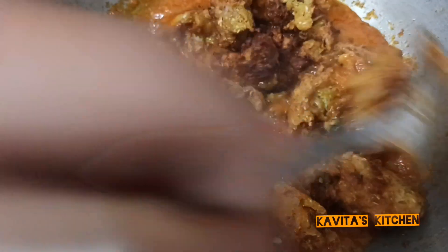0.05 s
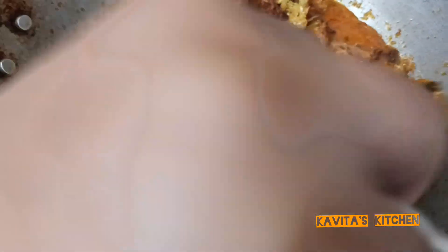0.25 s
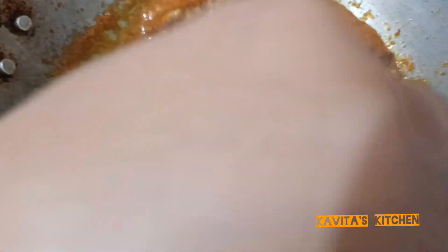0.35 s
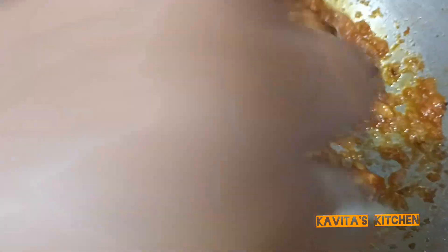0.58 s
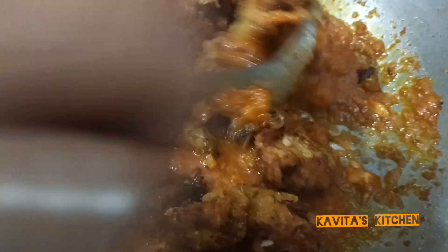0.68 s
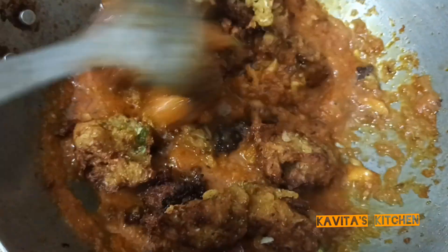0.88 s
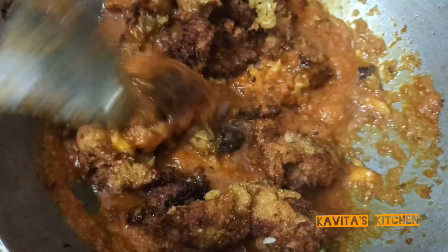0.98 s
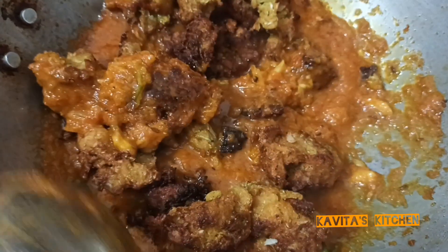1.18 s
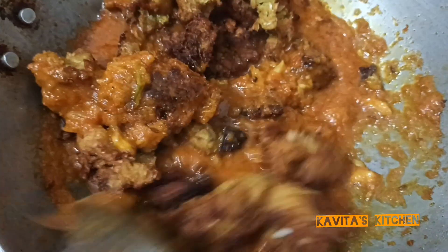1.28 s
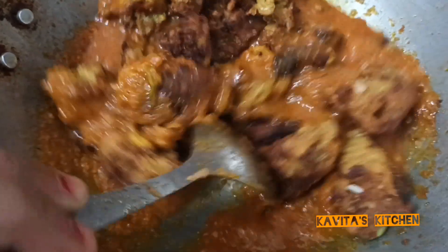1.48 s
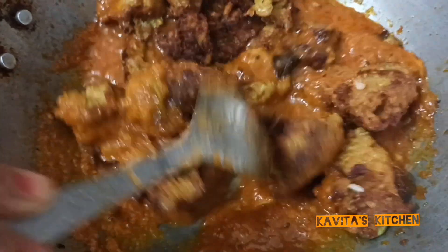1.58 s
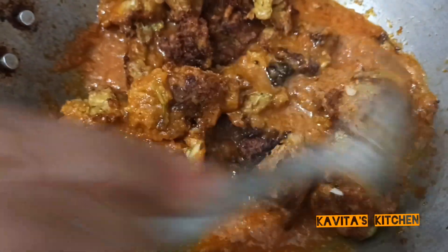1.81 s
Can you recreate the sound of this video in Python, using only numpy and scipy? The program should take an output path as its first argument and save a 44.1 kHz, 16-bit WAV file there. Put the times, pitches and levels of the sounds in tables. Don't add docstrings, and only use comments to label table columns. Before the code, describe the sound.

A metal spoon scrapes a metal pan: a faint stroke end, a loud bright scrape, then two softer strokes each opening with a sharp knock. Wet ticks and faint kitchen hum; close stereo microphones.

```python
import sys
import numpy as np
from scipy import signal
from scipy.io import wavfile
from scipy.ndimage import uniform_filter1d

SR = 44100
rng = np.random.default_rng(int(sys.argv[2]) if len(sys.argv) > 2 else 0)


def master(y):
    cut = np.clip(np.atleast_2d(y).T, -1, 1)
    pcm = np.round(cut * 32767)
    wavfile.write(sys.argv[1], SR, pcm.astype(np.int16))


def attenuation_scalar(level_db):
    decades = np.asarray(level_db, float) / 20
    return 10 ** decades


N = 81585

# t/s, pressure/dB, brightness/(dB/octave), bass weight/dB
TAIL_CONTACT = [
    (0, -39.5, -5.5, 2.5),
    (0.046, -54.5, -7, 10.5),
    (0.083, -56.5, -6.5, -14.5),
    (0.128, -73, 9, 28.5),
]
FIRST_CONTACT = [
    (0.143, -26.5, 4.5, -7.5),
    (0.199, -26, -3, 5),
    (0.258, -33, -8.5, -1.5),
    (0.329, -47, -15, -10),
    (0.379, -65.5, -1, -20),
    (.43, -83, -13, 0),
]
SECOND_CONTACT = [(0.795, -42, 6, -19), (0.857, -34, 0, -9), (.93, -44.5, -1, 9.5),
                  (0.978, -51.5, -2.5, 12.5), (1.007, -61, 0, -5), (1.053, -53, -7, -36),
                  (1.11, -64, -2, -36), (1.16, -73, 4.5, -28), (1.219, -100, -18, -10)]
THIRD_CONTACT = [(1.464, -39, 0, 10.5), (1.52, -33.5, 2.5, 4), (1.559, -35.5, -3.5, 4.5),
                 (1.6, -42, -3.5, 7), (1.649, -40.5, -7, 1), (1.689, -47, -9, -46), (1.73, -60.5, 1, -35),
                 (1.77, -80, -11, -7)]
# f/Hz, density level/dB
TAIL_BODY = [(70, -28), (340, -17.5), (1080, -22), (2430, -4), (7000, -23.5)]
FIRST_BODY = [(60, -32), (200, -5), (310, -2.5), (1060, -13), (1500, -10), (2200, -8.5), (4500, -6.5),
              (16000, -25.5)]
SECOND_BODY = [(100, -69), (250, -34), (340, -6), (1000, -9), (1700, -4.5), (2600, -10), (7000, -15),
               (16000, -24)]
THIRD_BODY = [(80, -51), (350, 2), (810, -16), (1200, -9.5), (2500, 4), (3500, -8.5), (6500, -1),
              (16000, -9)]
# f/Hz, width/Hz, level/dB
TAIL_MODES = [(1606, 65, -4), (2293, 35, 8), (2880, 69, -1.5), (3450, 55, 0.5), (4340, 83, -16)]
FIRST_MODES = [(868, 35, -10.5), (1017, 37, -9.5), (1227, 210, 0.5), (2122, 42, -1.5), (2204, 270, 2.5),
               (3080, 70, -21), (3825, 44, -14)]
SECOND_MODES = [(352.5, 16.4, 7), (505, 16, -9), (920, 6.2, -9), (1365, 9.1, 3), (1770, 16, -10),
                (2434, 310, 11), (3700, 110, -40.5), (5320, 150, -4)]
THIRD_MODES = [(356, 8.3, -6.5), (826, 107, 1.5), (1338, 28, -15), (2300, 260, -10), (3000, 94, -22),
               (4240, 660, 1), (6220, 43, -3)]
STROKE_MODES_DB = [-6, -4.5, -1, -2]
STROKE_PAN_DB = [1.5, -0.9, -1, 0.7]
# f/Hz, width/Hz, depth/0-1
STROKE_GAPS = [
    [(7500, 900, .6)],
    [(1550, 200, .4)],
    [(720, 200, .5), (8100, 500, .7)],
    [(1180, 350, .95), (3550, 900, 1), (5650, 1000, .85), (8300, 800, .7)],
]
# start t/s, length/s, level/dB, f/Hz
LINGERING_MODES = [(0.172, 0.2, -51.5, 85.7), (0.309, 0.079, -58, 3656), (0.332, 0.086, -60.5, 2226),
                   (1.031, 0.04, -58, 5010), (1.142, 0.056, -63.5, 3700), (1.496, 0.034, -57, 107.5),
                   (1.568, 0.11, -59.5, 100.7), (1.696, 0.051, -57, 1440), (0.061, 0.055, -57.5, 1444),
                   (.005, 0.02, -55, 2830), (0.147, 0.082, -33, 1036), (0.804, 0.094, -43, 344),
                   (0.815, 0.057, -53, 605), (0.881, 0.035, -47.5, 957), (.92, 0.069, -49, 482),
                   (0.852, 0.055, -43.5, 1690), (1.089, 0.024, -64.5, 4600), (1.03, 0.054, -60, 2500),
                   (1.486, 0.18, -54, 351), (1.512, 0.027, -39, 6500), (1.52, .14, -50.5, 6950),
                   (1.559, 0.18, -52, 4210), (1.589, 0.023, -46.5, 1426), (1.779, 0.028, -61, 4010),
                   (0, 0.031, -54, 4290), (0.031, .035, -62, 3540)]
# t/s, peak level/dB, left-right/dB, t60/s
LANDINGS = [
    (0.788, -12.5, -3.5, 0.0082),
    (1.457, -15.5, -0.5, 0.0084),
]
# f/Hz, density level/dB
KNOCK_1_BODY = [(40, -34), (150, -25), (500, -28), (2000, -8), (2670, -6.5), (3500, -6), (9400, -8),
                (16500, -2)]
KNOCK_2_BODY = [(100, -63), (860, -18), (1450, -36.5), (2850, -7), (3540, -16.5), (4700, -5), (5900, -15.5),
                (16500, -3.5)]
# f/Hz, width/Hz, level/dB
KNOCK_1_MODES = [(2680, 73, -0.5), (9270, 300, -2), (15700, 440, -4)]
KNOCK_2_MODES = [(2960, 100, -19), (4670, 68, -6), (7760, 74, -3.5), (9900, 200, -5.5)]
# t/s, peak level/dB, f/Hz, left-right/dB
TICKS = [(0.071, -41, 3940, 8), (0.0773, -47.5, 9200, 9), (.327, -44.5, 10450, 5.5), (0.357, -41, 5900, 3),
         (0.431, -46.5, 3670, 2), (0.4477, -49, 11000, -5), (0.460, -47.5, 10330, -2.5),
         (0.469, -47, 5800, 3), (0.4965, -42.5, 7360, -5), (0.5257, -41, 5370, 7), (0.563, -48, 10300, 1.5),
         (0.5843, -46, 4870, 2), (0.594, -52, 9900, -2), (0.638, -51, 5500, 6), (0.719, -53, 10200, -6),
         (0.925, -33.5, 10500, -13), (.930, -34.5, 10360, -9), (0.934, -36.5, 10800, -12),
         (.980, -43.5, 10200, -4), (0.985, -41, 10600, -10), (1.033, -46, 10100, -6),
         (1.039, -47, 9900, -4), (1.0899, -42, 4700, -4), (1.1034, -51.5, 10100, -4),
         (1.1517, -46.5, 4140, -10), (1.1565, -53, 5430, -7), (1.2225, -47, 10200, -3.5),
         (1.247, -50.5, 2120, -2.5), (1.3053, -55, 10460, 0), (1.3183, -46, 10640, -9),
         (1.3497, -49.5, 6690, -7), (1.3785, -63, 6160, 10), (1.39, -42.5, 4300, 1),
         (1.7067, -29.5, 5100, 14.5), (1.7104, -37, 9850, 5), (1.75, -41, 7500, -1),
         (1.7618, -32.5, 9970, 14), (1.7766, -39.5, 4130, 14), (1.801, -52, 4770, 26),
         (1.8166, -50.5, 10100, -4), (1.8430, -41.5, 2330, 28)]
# f/Hz, density level/dB
HUM_COLOUR = [(25, -29), (92, -8), (152, -17.5), (300, -2.5), (532, -13.5), (1450, -15.5), (7000, -22),
              (16000, -21)]
# from t/s, until t/s, level/dB
BACKGROUND_STEPS = [
    (0, 0.123, -0.5),
    (0.16, 0.44, -1.5),
    (.8, 1.255, -4.5),
    (1.465, 1.69, 6.5),
]
# f/Hz, level/dB
MIC_LEFT = [(7300, 5), (8300, 1), (9300, 4.5), (10300, 7.5), (11800, -6.5), (13000, -4), (14000, -29),
            (15000, -7.5)]
MIC_RIGHT = [(7300, 4.5), (8300, -7.5), (9300, 7), (10300, 6.5), (11800, 4), (13000, -29), (14000, 2),
             (15000, 4)]

LAND_S, LIFT_S = .002, .02
SLIPS_PER_S, SLIP_SPREAD_DB, CHATTER_DB = 6000, 1, -0.5
BRIGHT_ABOVE_HZ, WEIGHT_BELOW_HZ = 2710, 454
WANDER_DB, WANDER_S = 2, .04
LINGER_Q = 20
KNOCK_MODES_DB, KNOCK_SEND_DB = -8.5, 1
TICK_S, TICK_DB, TICK_SEND_DB = 0.00099, -7.5, 0.5
CRACKLE_PER_S, CRACKLE_DB, CRACKLE_SPREAD_DB = 900, -69, 4
HUM_DB, HUM_PATCH_DB = -65.5, 2
BOWL_HZ, BOWL_BASS = 454, 0.73
BOWL_DB, BOWL_T60_S, TURN_S = 7, 0.011, .04
ROOM_DB, ROOM_T60_S = 6.5, 0.1
SPACE_DB, LAG_S = -10.5, .001
EDGE_HZ, TOP_HZ, GATE_DB, SHELF_DB = 15950, 16850, -62, -13


def evened(x):
    return x / np.sqrt(np.mean(x ** 2) + 1e-20)


def read(points, hz):
    f, value = np.transpose(points)
    return np.interp(np.log(hz + 1), np.log(f + 1), value)


def add(mix, s, sound):
    part = mix[..., round(s * SR):][..., :sound.shape[-1]]
    part += sound[..., :part.shape[-1]]


def coloured(x, points):
    gain_db = np.maximum(read(points, np.fft.rfftfreq(4096, 1 / SR)), -100)
    half = np.log(attenuation_scalar(gain_db))
    full = np.concatenate([half, half[-2:0:-1]])
    taps = np.fft.ifft(np.exp(np.conj(signal.hilbert(full)))).real[:2048]
    return signal.oaconvolve(x, taps)[:len(x)]


def mode(x, hz, width_hz):
    pole = np.exp((2j * np.pi * hz - np.pi * width_hz) / SR)
    return 2 * signal.lfilter([1 - abs(pole)], [1, -pole], x).real


def clicks(per_s, spread_db):
    size = attenuation_scalar(spread_db * np.minimum(rng.exponential(1, N), 4))
    sign = rng.choice([-1., 1.], N)
    return size * sign * (rng.random(N) < per_s / SR)


def slow(seconds):
    knots = rng.standard_normal(200)
    return np.interp(np.arange(N) / SR / seconds, np.arange(len(knots)), knots)


def panned(x, pan_db):
    return x * attenuation_scalar(np.array([[.5], [-.5]]) * pan_db)


def stroke(contact_curve, body, ring, ring_db, pan_db, gaps):
    s, level_db, bright, weight_db = np.transpose(contact_curve)
    slips = clicks(SLIPS_PER_S, SLIP_SPREAD_DB)
    chatter = evened(uniform_filter1d(rng.standard_normal(N), size=180))
    slips = slips * attenuation_scalar(CHATTER_DB * chatter)
    rasp = evened(coloured(slips, body))

    modes = np.zeros(N)
    for hz, width_hz, db in ring:
        drive = slips * attenuation_scalar(db + WANDER_DB * slow(WANDER_S))
        modes += mode(drive, hz, width_hz) / np.sqrt(width_hz)
    both = rasp + attenuation_scalar(ring_db) * evened(modes)
    for hz, width_hz, depth in gaps:
        both = both - np.clip(depth, 0, 1) * mode(both, hz, width_hz)

    hz, frames_s, z = signal.stft(both, SR, nperseg=128)
    octaves = np.log2(np.maximum(hz, BRIGHT_ABOVE_HZ) / BRIGHT_ABOVE_HZ)[:, None]
    z = z * attenuation_scalar(octaves * np.interp(frames_s, s, bright))
    pan = signal.istft(z, SR, nperseg=128)[1][:N]

    t = np.arange(N) / SR
    low = signal.sosfiltfilt(signal.butter(2, WEIGHT_BELOW_HZ, fs=SR, output="sos"), pan)
    pan = pan - low + low * attenuation_scalar(np.interp(t, s, weight_db))
    landed = np.clip((t - s[0]) / LAND_S + 1, 0, 1)
    lifted = np.clip((s[-1] - t) / LIFT_S + 1, 0, 1)
    return panned(pan * landed * lifted * attenuation_scalar(np.interp(t, s, level_db)), pan_db)


def lingering():
    out = np.zeros((2, N))
    settle = SR // 4
    for s, length_s, db, hz in LINGERING_MODES:
        u = np.arange(0, length_s, 1 / SR) / length_s
        noise = rng.standard_normal(settle + len(u))
        width_hz = hz / LINGER_Q
        rub = mode(mode(noise, hz, width_hz), hz, width_hz)[settle:]
        swell = np.sqrt(abs(np.sin(np.pi * u ** 0.68)))
        add(out, s, attenuation_scalar(db) * evened(rub) * swell)
    return out


def landings():
    out, t = np.zeros((2, N)), np.arange(3000) / SR
    bodies, rings = (KNOCK_1_BODY, KNOCK_2_BODY), (KNOCK_1_MODES, KNOCK_2_MODES)
    for (s, db, pan_db, t60_s), body, ring in zip(LANDINGS, bodies, rings):
        envelope = np.minimum(t / 0.0007, 1) * attenuation_scalar(-60 * (t / t60_s) ** 2)
        blow = rng.standard_normal(len(t)) * envelope
        modes = sum(attenuation_scalar(mode_db) * evened(mode(blow, hz, width_hz)) for hz, width_hz, mode_db in ring)
        burst = evened(coloured(blow, body)) + attenuation_scalar(KNOCK_MODES_DB) * modes
        add(out, s - .001, panned(attenuation_scalar(db) * burst / abs(burst).max(), pan_db))
    return out


def tick(hz, cycles):
    t = np.arange(600) / SR
    u = t * hz / cycles
    snap = .5 * rng.standard_normal(len(u)) * np.exp(-t / 0.0012)
    ring = np.e * 3 * u * np.exp(-3 * u) * np.sin(2 * np.pi * cycles * u)
    return ring + np.diff(snap, prepend=0) * 0.91


def food():
    out = np.zeros((2, N))
    for s, db, hz, pan_db in TICKS:
        snap = attenuation_scalar(db + TICK_DB) * tick(hz, hz * TICK_S)
        add(out, s, panned(snap, np.clip(pan_db, -12, 12)))
    return out


def crackle():
    fine = np.zeros((2, N))
    for hz in np.geomspace(4500, 15000, 16):
        snaps = clicks(CRACKLE_PER_S / 16, CRACKLE_SPREAD_DB)
        fine += panned(signal.oaconvolve(snaps, tick(hz, 2.4))[:N], 5 * rng.uniform(-1.7, 1))
    return attenuation_scalar(CRACKLE_DB) * evened(fine)


def hum():
    frames, hz = N // 256 + 5, np.fft.rfftfreq(1024, 1 / SR)
    a, b, c, d, patches = rng.standard_normal((frames, 513, 5)).T
    patches = uniform_filter1d(patches, size=10, axis=0)
    patches = evened(uniform_filter1d(patches, size=12, axis=1))
    same = np.clip(read([(60, 0.78), (200, 0.95), (800, 0.25)], hz), 0, 1)[:, None]
    left = a + 1j * b
    right = same * left + np.sqrt(1 - same ** 2) * (c + 1j * d)
    z = np.array([left, right]) * attenuation_scalar(read(HUM_COLOUR, hz)[:, None] + HUM_PATCH_DB * patches)
    return attenuation_scalar(HUM_DB) * evened(signal.istft(z, nperseg=1024, noverlap=768)[1][:, :N])


def background_gain():
    t = np.arange(N) / SR
    steps_db = sum(db * ((t >= a) & (t < b)) for a, b, db in BACKGROUND_STEPS)
    return attenuation_scalar(uniform_filter1d(steps_db, size=600))


def echoes():
    t = np.arange(SR // 3) / SR
    shape = (3, 2, 2, len(t))
    taps = rng.standard_normal(shape) * (rng.random(shape) < .15)
    taps = signal.sosfilt(signal.butter(2, BOWL_HZ, "high", fs=SR, output="sos"), taps)
    tails = taps * attenuation_scalar(-60 * t / np.array([BOWL_T60_S, ROOM_T60_S])[:, None, None])
    tails = tails / np.linalg.norm(tails, axis=3, keepdims=True)
    return attenuation_scalar(BOWL_DB) * tails[:, 0] + attenuation_scalar(ROOM_DB) * tails[:, 1] * (t > .004)


def space(x, bowls):
    out = x + BOWL_BASS * signal.sosfilt(signal.butter(2, BOWL_HZ, fs=SR, output="sos"), x)
    t = np.arange(N) / SR
    for k, bowl in enumerate(bowls):
        turn = np.sqrt(2 / 3) * np.cos(np.pi * (t / TURN_S + k) / 3)
        out = out + signal.fftconvolve(x * turn, bowl, axes=1)[:, :N]
    return out


def scene():
    strokes = zip((TAIL_CONTACT, FIRST_CONTACT, SECOND_CONTACT, THIRD_CONTACT),
                  (TAIL_BODY, FIRST_BODY, SECOND_BODY, THIRD_BODY),
                  (TAIL_MODES, FIRST_MODES, SECOND_MODES, THIRD_MODES),
                  STROKE_MODES_DB, STROKE_PAN_DB, STROKE_GAPS)
    drag = sum(stroke(*settings) for settings in strokes)
    bowls = echoes()
    background = (hum() + crackle()) * background_gain()
    knocks = landings()
    drag = drag + lingering()
    wet = food()
    sent = drag + attenuation_scalar(KNOCK_SEND_DB) * knocks + attenuation_scalar(TICK_SEND_DB) * wet
    mix = space(sent, bowls) * attenuation_scalar(SPACE_DB) + knocks + wet + background
    half_lag = round(LAG_S * SR / 2)
    return np.array([np.roll(mix[0], half_lag), np.roll(mix[1], -half_lag)])


def top_cut(x):
    return signal.sosfilt(signal.butter(12, 17020, fs=SR, output="sos"), x)


def record(dry):
    x = np.array([coloured(dry[0], MIC_LEFT), coloured(dry[1], MIC_RIGHT)])
    edge = signal.firwin(511, EDGE_HZ, window=("kaiser", 9), fs=SR)
    top = signal.firwin(511, TOP_HZ, window=("kaiser", 9), fs=SR)
    air = attenuation_scalar(SHELF_DB) * signal.oaconvolve(x, (top - edge)[None], "same", axes=1)
    opened = uniform_filter1d((air ** 2).mean(0), size=300) > attenuation_scalar(2 * GATE_DB)
    below = signal.oaconvolve(x, edge[None], "same", axes=1)
    mix = below + air * uniform_filter1d(1. * opened, size=300)
    return top_cut(mix)


dry = scene()
out = record(dry)
master(out)
```